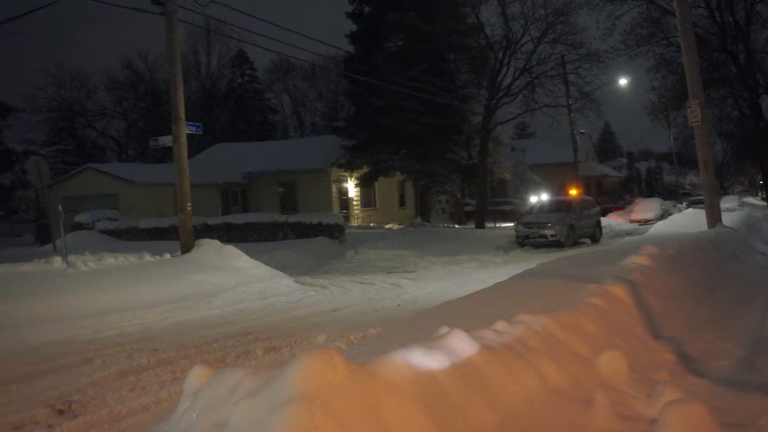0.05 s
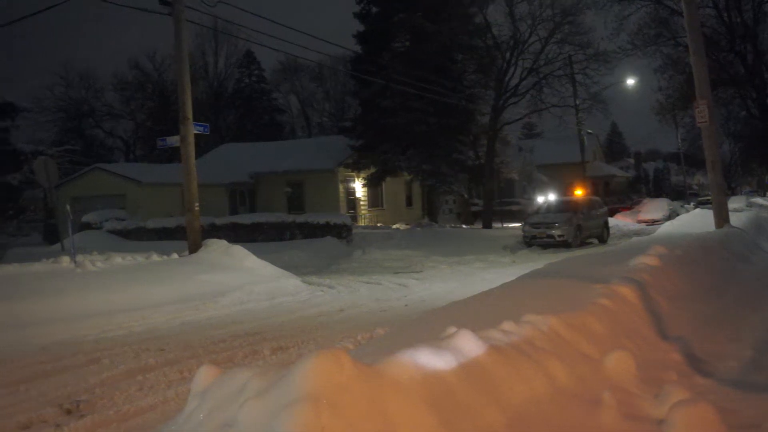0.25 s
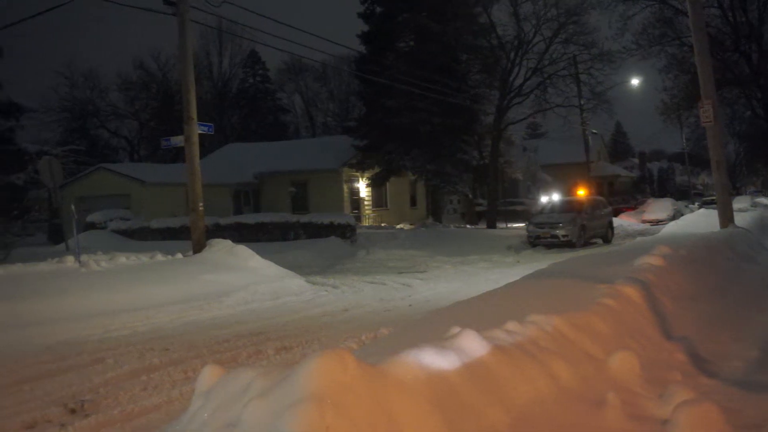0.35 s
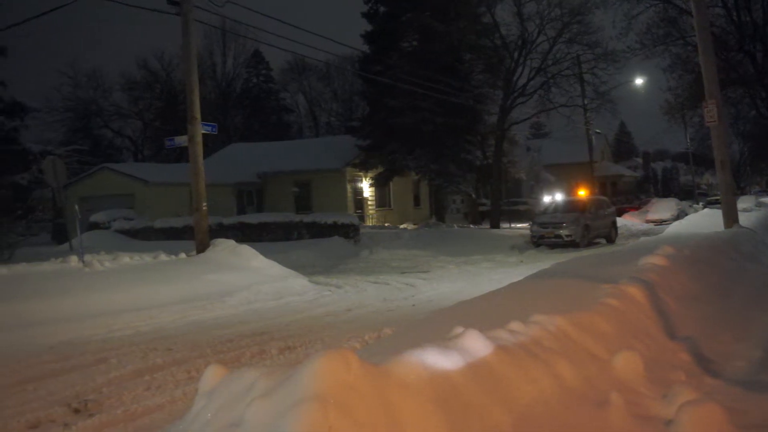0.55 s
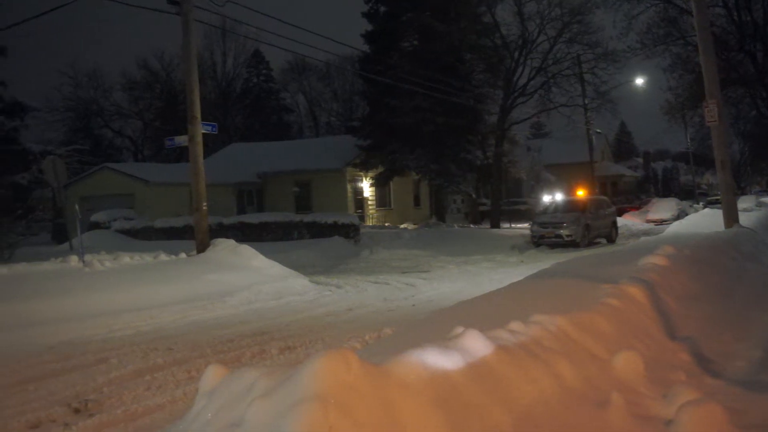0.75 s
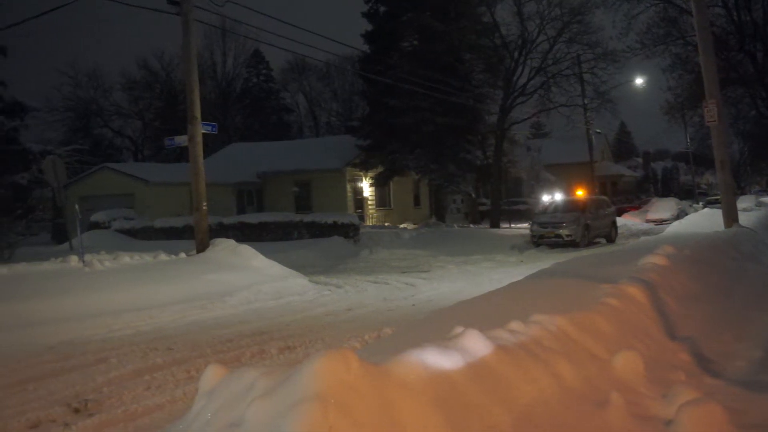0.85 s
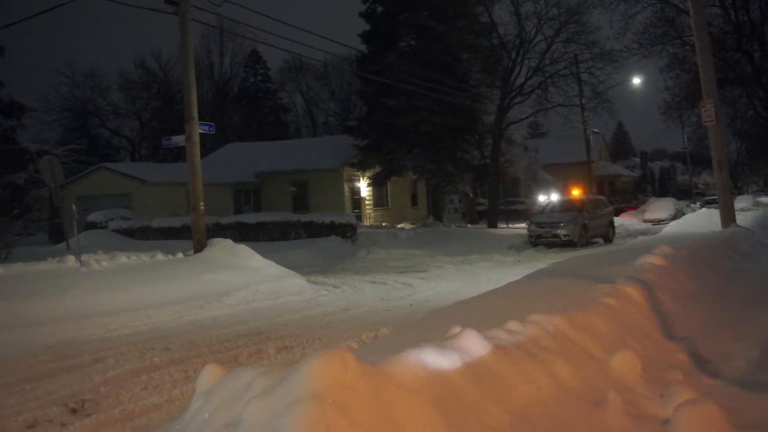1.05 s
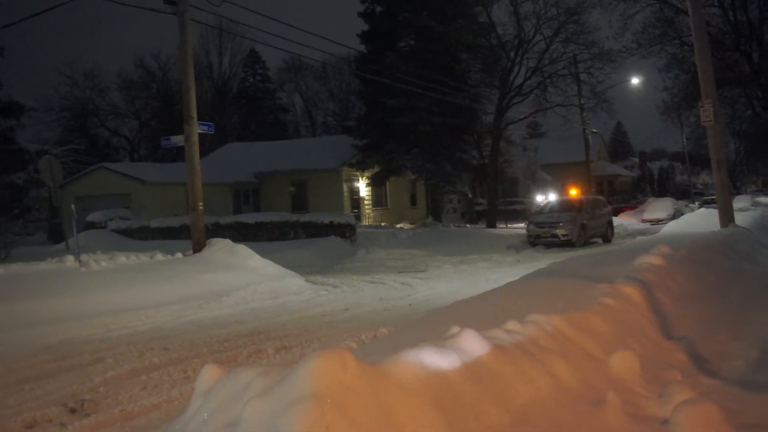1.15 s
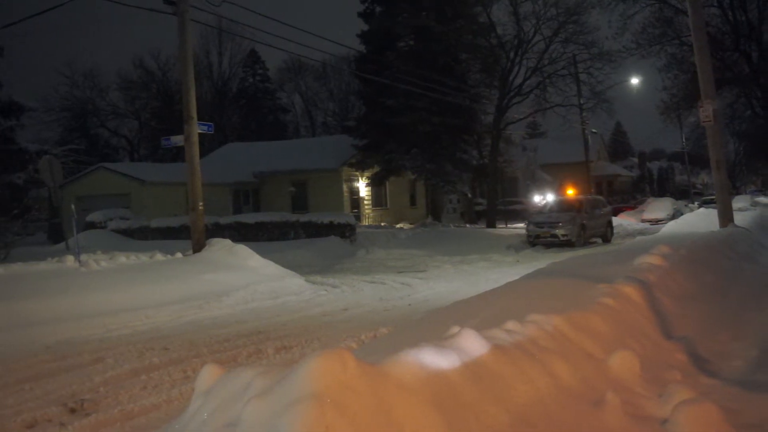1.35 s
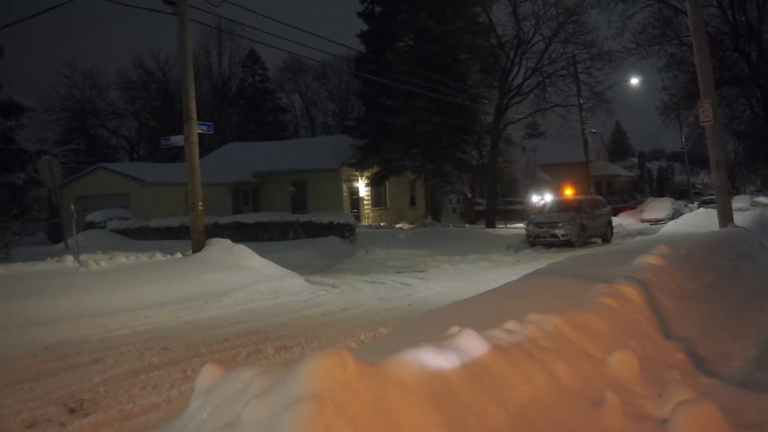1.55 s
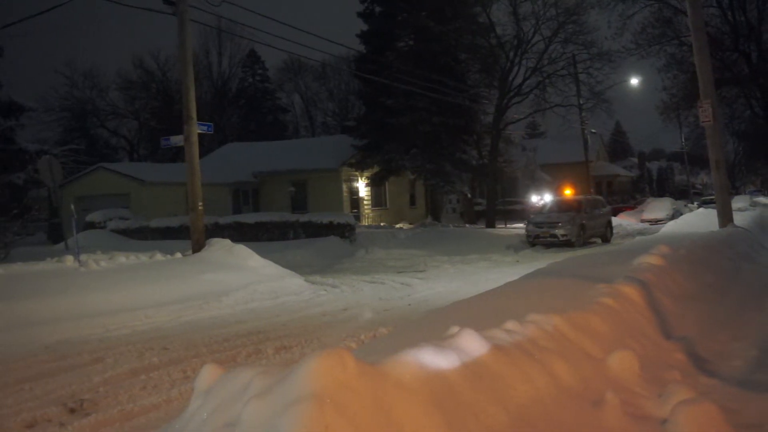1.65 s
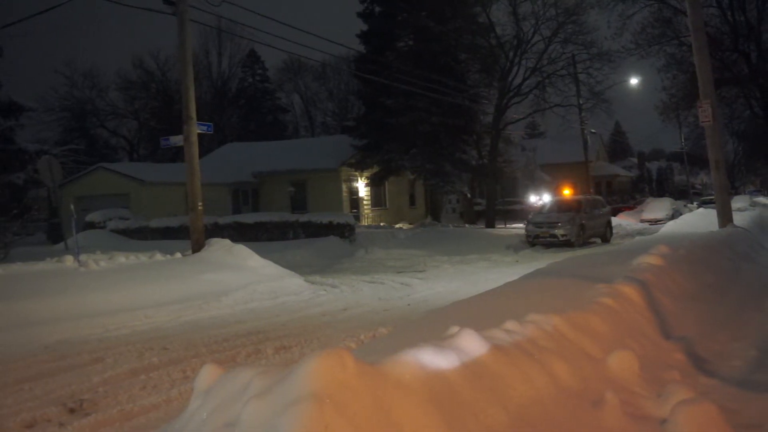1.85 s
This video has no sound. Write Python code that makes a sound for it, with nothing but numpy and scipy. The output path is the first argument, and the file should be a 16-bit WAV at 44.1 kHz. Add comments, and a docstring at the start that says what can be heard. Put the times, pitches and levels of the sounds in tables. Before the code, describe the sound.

Rapid metallic clacking from a pickup's spinning chained tyre, easing into faint jingling.

```python
"""A fast run of metal slaps rings out some way off: a pickup spins a chained tyre on a snowy night.
Each slap is a quick shower of links that crack on the ice, ring, and knock a hollow clonk from the wheel.
The slaps speed up as the engine climbs. Then the tyre grips and the slack chain clinks and jingles on.
Underneath are the engine's hum, a few soft thuds and the hush of the street."""
import sys
import numpy as np
from scipy import signal
from scipy.fft import rfft, irfft
from scipy.io import wavfile

SR = 44100
rng = np.random.default_rng(int(sys.argv[2]) if len(sys.argv) > 2 else 0)


def wav_record(signal):
    """Record a signal, one row per channel, as 16-bit PCM in the file named by sys.argv[1]."""
    frames = np.transpose(np.atleast_2d(signal))
    bounded = np.clip(frames, -1, 1)
    # unit amplitude maps onto the largest positive 16-bit level
    quanta = np.round(bounded * 32767).astype(np.int16)
    wavfile.write(sys.argv[1], SR, quanta)


N = 83790

# Chains hitting the road: time_s, level_db, extra_clonk_db, extra_crack_db, clonk_pitch_hz
SLAPS = [(0.221, -28.5, -10, -6, 850), (0.2478, -25, -4.5, 2, 870), (0.276, -20.5, -10, -2, 810),
         (0.3059, -20.5, 0.5, 5, 830), (0.3341, -17.5, -1.5, 1.5, 804), (0.3633, -18, -1, 5, 920),
         (0.3935, -14, 0.5, -2.5, 850), (0.423, -18.5, 2, 2.5, 934), (0.4532, -16.5, -1.5, 4, 800),
         (0.4834, -15.5, 2.5, 1, 843), (0.514, -14, -2, 1, 930), (0.5422, -15, 5, 1.5, 863),
         (0.5714, -13.5, 2.5, -1, 952), (0.6003, -17.5, 8, 2, 880), (0.6291, -15.5, 3, 3, 950),
         (0.657, -16.5, 0.5, 4.5, 836), (0.6848, -13.5, -1, 4, 919), (0.714, -14.5, -4, -1.5, 974),
         (0.7418, -13, -7, 3.5, 866), (0.7702, -15, 5.5, 1.5, 927), (0.7979, -18.5, 6, 8, 923),
         (0.8252, -15.5, 0, 0.5, 848), (0.8523, -14.5, 4.5, 0.5, 825), (0.879, -16, 1, 2.5, 807),
         (0.907, -14, -2.5, 3, 854), (0.9333, -17.5, 3.5, 6, 800), (0.9593, -10.5, -2, -0.5, 924),
         (0.9861, -17, 0.5, 4.5, 871), (1.012, -17, -8, 6.5, 990), (1.0389, -13.5, -2, -2.5, 920),
         (1.0629, -14, 1.5, 2.5, 970), (1.0869, -19, -19, 4, 920), (1.1114, -16, -9, 4, 835),
         (1.1359, -15, -1.5, -2.5, 850), (1.159, -19, -7, 0, 870), (1.1813, -23, 7, 2.5, 860),
         (1.2056, -25, 2, 0.5, 846), (1.2257, -22, -3, -1, 884), (1.2487, -24, -7, -2, 835),
         (1.2731, -27, -5, -3, 840), (1.292, -30, -12, -1, 834)]
# Slack chain clinking as the wheel rolls: time_s, level_db, rise_and_fall_s, crunch_db
CLINKS = [(1.3233, -35.5, 0.0015, -4), (1.3513, -37, 0.0022, 0), (1.392, -36, 0.0025, 1.5),
          (1.4131, -34.5, 0.0027, -4), (1.4906, -28, 0.0022, -8), (1.511, -36.5, 0.0031, -9),
          (1.585, -38.5, 0.0028, -2), (1.598, -31.5, 0.0072, -6), (1.678, -33.5, 0.0057, -7),
          (1.756, -34.5, 0.0091, -25)]
# Ringing notes of the chain on the road: pitch_hz, width_hz, level_db
CHAIN_NOTES = [(1460, 185, -1), (1725, 365, 1), (1935, 220, 0.5), (2288, 264, 0), (2620, 490, -1.5),
               (2792, 138, 7.5), (3477, 126, 1.5), (3783, 320, -0.5)]
# Upper edge of that ring, lower for the clinks: time_s, cutoff_hz
RING_TOP = [(1.28, 3880), (1.45, 2893)]
# Notes that linger in the steel links: pitch_hz, level_db
LINK_NOTES = [(1505, -36), (1779, 4), (1904, 2), (2325, -18), (2564, 11.5), (2680, 5), (2771, 6.5),
              (3380, 4), (3500, 4), (3797, 6.5), (4155, -14.5), (6910, -4), (7644, -34)]
# High zing of the tight chain: pitch_hz, width_hz, level_db
ZING_NOTES = [(3435, 155, -2.5), (3810, 230, -4.5), (4170, 110, 1.5)]
# Strength of the zing within a hit: time_s, level_db
ZING_LEVEL = [(.25, -32), (.33, -8.5), (.42, -12.5), (.454, -5.5), (.484, -15), (.514, -6), (.57, -18),
              (.66, -32), (.92, -20), (1.1, -13.5), (1.3, -18), (1.45, -25)]
# The wheel's own note beside its main clonk: pitch_hz, width_hz, level_db
WHEEL_NOTES = [(812, 45, -10)]
# Dull ring of the slack chain: pitch_hz, width_hz, level_db
SLACK_NOTES = [(2310, 143, 4), (1590, 900, -16), (790, 120, -4)]
# Tone of steel cracking on ice: frequency_hz, level_db
CRACK_TONE = [(100, -23.5), (400, 1), (600, 1.5), (1500, 8.5), (3900, 3), (4600, -1.5), (5400, -3.5),
              (6300, -2.5), (6900, 5.5), (7700, 6), (9000, 0), (10200, 0), (11000, 2.5)]
# Tone of slack chain crunching into snow: frequency_hz, level_db
CRUNCH_TONE = [(200, -22), (600, 4.5), (2300, 10), (3800, 2), (4700, 0), (5800, -6), (7500, -8.5),
               (11000, -8.5)]
# Tone of the loose links jingling: frequency_hz, level_db
JINGLE_TONE = [(200, -57.5), (550, -1), (870, 3.5), (1200, -9), (1700, 7), (2000, 1), (2330, 4.5),
               (2550, 0.5), (2800, 4), (3400, 0.5), (4100, -11), (4800, -17.5), (6200, -14), (7000, -24.5),
               (11000, -20.5)]
# How the jingle swells and fades: time_s, level_db
JINGLE_LEVEL = [(0, -43), (.2, -43.5), (.3, -38), (.55, -35), (1.1, -31.5), (1.25, -37.5), (1.38, -38.5),
                (1.55, -41), (1.72, -42), (1.9, -42)]
# The engine's speed and loudness: time_s, firing_rate_hz, level_db
ENGINE = [(0, 73.2, -62), (.16, 71.5, -73), (.21, 69.6, -64), (.33, 67.4, -71), (.52, 69.4, -65.5),
          (.8, 73, -62), (1, 76.2, -58.5), (1.12, 81.1, -56.5), (1.27, 93.2, -65), (1.36, 90, -66.5),
          (1.72, 90.3, -66), (1.9, 100.7, -69)]
# Tones that make up the engine's hum: multiple_of_firing_rate, level_db
ENGINE_TONES = [(1, 3), (2, -20), (3, -3), (4, -21)]
# Low thuds and groans of the truck: peak_s, half_length_s, pitch_hz, width_hz, level_db
THUDS = [(0.01, 0.082, 363, 90, -45.5), (0.124, 0.054, 289, 40.4, -42), (1.557, 0.034, 141.6, 39.5, -48),
         (1.709, 0.012, 93.4, 28, -47)]
# Tone of the street's hush: frequency_hz, level_db
STREET_TONE = [(20, -30), (45, -10), (80, -7), (150, -2), (270, 2), (370, 1), (560, 3), (850, 3.5),
               (1200, 0), (2500, -5), (4700, -21), (8000, -17), (11000, -26)]
# Loudness of that hush: time_s, level_db
STREET_LEVEL = [(0, -40.5), (.3, -42), (1.1, -41), (1.5, -43), (1.9, -46.5)]
# Tone of the echoes: frequency_hz, level_db
ECHO_TONE = [(200, -10), (600, -3), (900, -3), (1700, -5), (3000, -1), (5000, -1.5), (8000, -4.5),
             (11000, -2.5)]
# Balance of the chains between the ears: frequency_hz, left_minus_right_db
BALANCE = [(60, 0.5), (110, -5), (190, 1), (350, 3.5), (630, -0.5), (1120, -1.5), (2020, -2), (3630, -0.5),
           (6520, -2), (11700, -1.0)]

SLAP_RISE_S, SLAP_FALL_S = 0.0019, 0.003  # how fast a shower of links swells and dies
CHAIN_DB, LINK_DB, CLONK_DB, CRACK_DB, SLACK_DB = -7, -10, -12.5, -9, -3.5  # parts within a hit
LINK_FADE_S, NEAR_FADE_S, FAR_FADE_S = .055, 0.045, 0.94  # time to die away by 60 dB
NEAR_ECHO_DB, FAR_ECHO_DB, ECHO_DELAY_S = -13.5, -12, .005
SIDES = np.array([[1], [-1]])  # left ear, right ear


def chains():
    """The spinning wheel slaps its chains on the road; once it rolls, the slack chain clinks more dully."""
    out = np.zeros(N)
    tilts = 2 * rng.uniform(-0.75, 1, len(SLAPS))  # each crack's brightness, in dB per octave
    for (at, db, clonk_db, crack_db, clonk_hz), tilt in zip(SLAPS, tilts):
        crack_tone = [(hz, gain + tilt * np.log2(hz / 7000) + 2 * rng.standard_normal())
                      for hz, gain in CRACK_TONE]
        clonk = lambda knock, t: wheel_clonk(knock, t, clonk_hz)
        add_hit(out, at, db, SLAP_RISE_S, SLAP_FALL_S,
                clonk, CLONK_DB + clonk_db, crack_tone, CRACK_DB + crack_db)
    slack = lambda knock, t: ring(knock, SLACK_NOTES)
    for at, db, spread_s, crunch_db in CLINKS:
        add_hit(out, at, db, spread_s, spread_s, slack, SLACK_DB, CRUNCH_TONE, crunch_db)
    return out


def add_hit(out, at, db, rise_s, fall_s, body, body_db, crack_tone, crack_db):
    """Links land, crack on the road, knock a body (the wheel or the slack chain) and ring on."""
    size, lead = 6144, 1024  # samples in the hit, and before its peak
    t = (np.arange(size) - lead) / SR
    landing = link_shower(t, rise_s, fall_s)
    # The body takes its knock just early; the road cracks just after the links land.
    early, late = t + .0008, t - .0012
    knock = body(link_shower(early, 0.88 * rise_s, 0.88 * fall_s), early)
    crack_s = 0.82 * (rise_s + fall_s) / 2
    crack = colour(link_shower(late, crack_s, crack_s), crack_tone)
    link_width_hz = np.log(1000) / (np.pi * LINK_FADE_S)
    links = ring(landing, [(hz, link_width_hz, gain) for hz, gain in LINK_NOTES])
    top_hz = np.interp(at, *np.array(RING_TOP).T)
    chain = lowpass(ring(landing, CHAIN_NOTES, pitch_spread=.018), top_hz, order=10)
    zing = lowpass(ring(landing, ZING_NOTES), hz=4375, order=16)
    zing_db = np.interp(at, *np.array(ZING_LEVEL).T)
    parts = [(chain, CHAIN_DB), (links, LINK_DB), (zing, zing_db), (knock, body_db), (crack, crack_db)]
    hit = sum(undb(part_db) * unit(part) for part, part_db in parts)
    strength = undb(db) * np.sqrt(.0075 * SR / size)  # as if the hit's energy were packed into 7.5 ms
    start = int((at - .0017) * SR) - lead
    out[start:start + size] += (strength * hit)[:N - start]


def link_shower(t, rise_s, fall_s, clump_s=.0012):
    """Links land in uneven clumps that swell to a peak near t = 0 and die away."""
    marks = np.arange(t[0], t[0] + len(t) / SR + clump_s, clump_s)
    clumps = undb(1.8 * np.interp(t, marks, rng.standard_normal(len(marks))))
    swell = np.exp(-np.logaddexp(-t / rise_s, t / fall_s))
    return clumps * link_ticks(per_s=6000, scatter_db=2.5, size=len(t)) * swell


def link_ticks(per_s, scatter_db, size):
    """Links touch at random moments, each making one tick of uneven strength."""
    touches = rng.random(size) < per_s / SR
    return touches * rng.choice([-1, 1], size) * undb(scatter_db * rng.standard_normal(size))


def ring(x, notes, pitch_spread=0.0039, scatter_db=2.5):
    """Struck metal rings at its own notes, a little different each time; narrow notes last longer."""
    out = 0
    for (hz, width, db), (shift, gain) in zip(notes, rng.standard_normal((len(notes), 2))):
        b, a = signal.iirpeak(hz * (1 + pitch_spread * shift), hz / width, fs=SR)
        out = -out + undb(db + scatter_db * gain) * signal.lfilter(b, a, x)  # notes alternate in sign
    return out


def wheel_clonk(knock, t, hz, width_hz=80):
    """The links and one firm push of the tyre draw a hollow clonk from the wheel."""
    push = 1.2 * np.linalg.norm(knock) * signal.unit_impulse(len(t), np.argmin(abs(t)))
    wheel_band = signal.butter(2, (600, 1150), "bandpass", fs=SR, output="sos")
    blow = signal.sosfilt(wheel_band, knock + push)
    return ring(blow, [(hz, width_hz, 0)]) + ring(blow, WHEEL_NOTES)


def jingle(groups=8, ring_s=.003):
    """Loose links tick against each other, each group with its own short ring."""
    links = sum(tail(link_ticks(per_s=3000 / groups, scatter_db=3.5, size=N), np.log(1000) * ring_s)
                for _ in range(groups))
    return unit(colour(links, JINGLE_TONE)) * undb(curve(JINGLE_LEVEL))


def engine():
    """The exhaust hums a low, slightly uneven note that climbs as the wheel spins up."""
    phase = 2 * np.pi * np.cumsum(curve(ENGINE)) / SR
    note = sum(undb(db) * np.sin(k * phase + rng.uniform(0, 2 * np.pi)) for k, db in ENGINE_TONES)
    flutter = 1 + 0.19 * unit(lowpass(rng.standard_normal(N), hz=13, order=2))
    return np.sqrt(2) * note * flutter * undb(curve(ENGINE, column=2))


def thuds():
    """The truck gives short, low swells of sound, made rough by a wobbling pitch."""
    t, out = np.arange(N) / SR, 0
    for at, half_length_s, hz, width, db in THUDS:
        wobble = unit(lowpass(rng.standard_normal(N), width, order=2))
        tone = np.sin(2 * np.pi * np.cumsum(hz + width / 2 * wobble) / SR)
        out = out + undb(db) * np.exp(-((t - at) / half_length_s) ** 2) * tone
    return out


def street():
    """The running truck and the town blend into a soft hush."""
    return unit(colour(rng.standard_normal(N), STREET_TONE)) * undb(curve(STREET_LEVEL))


def echoes(x):
    """Sound bounces briefly off the truck and snowbanks, and lingers faintly among the houses."""
    bounced = colour(np.roll(x, int(ECHO_DELAY_S * SR)), ECHO_TONE)
    near = undb(NEAR_ECHO_DB) * tail(bounced, NEAR_FADE_S)
    return near + undb(FAR_ECHO_DB) * tail(bounced, FAR_FADE_S)


def stereo(x, side_db, delay_s=.002):
    """Place a sound a little to the right; nearby echoes differ between the ears."""
    hz, db = np.array(BALANCE).T
    balance_db = np.interp(np.log(np.fft.rfftfreq(N, 1 / SR) + 1), np.log(hz), db)
    placed = irfft(rfft(x) * undb(SIDES * balance_db / 2), N)
    side = tail(np.roll(x, int(delay_s * SR)), fade_s=.016)
    return placed + undb(side_db) * side * SIDES


def tail(x, fade_s):
    """Smear a sound into many tiny echoes that fall by 60 dB in fade_s."""
    t = np.arange(SR) / SR
    response = rng.standard_normal(SR) * np.exp(-np.log(1000) * t / fade_s)
    return signal.fftconvolve(x, response / np.linalg.norm(response))[:len(x)]


def colour(x, tone, size=2048):
    """Shape a sound's lows and highs to follow a tone table."""
    hz, db = np.array(tone).T
    gains = undb(np.interp(np.log(np.fft.rfftfreq(size, 1 / SR) + 1), np.log(hz), db))
    # Fold the filter so that it rings only after a tick, never before it.
    folded = irfft(np.log(gains))
    folded[1:size // 2] *= 2
    folded[size // 2 + 1:] = 0
    response = irfft(np.exp(rfft(folded)))
    return signal.fftconvolve(x, response / np.linalg.norm(response))[:len(x)]


def lowpass(x, hz, order):
    """Keep what lies below hz; a higher order cuts more steeply."""
    return signal.sosfilt(signal.butter(order, hz, fs=SR, output="sos"), x)


def curve(table, column=1):
    """Join one column of a table with straight lines over time."""
    rows = np.array(table)
    return np.interp(np.arange(N) / SR, rows[:, 0], rows[:, column])


def undb(db):
    """Turn decibels into a number to multiply by."""
    return 10 ** (np.asarray(db) / 20)


def unit(x):
    """Scale a sound to an average power of 1."""
    return x / np.sqrt(np.mean(x ** 2) + 1e-20)


def scene():
    """Chains, echoes and jingle sit a little to the right; engine, thuds and hush a little to the left."""
    hits = chains()
    bounces = echoes(hits)
    background = (street() + engine() + thuds()) * undb(1.5 * SIDES / 2)
    background += undb(-13) * street() * SIDES  # a second hush makes the street sound wide
    return stereo(hits, side_db=-16.5) + stereo(bounces + jingle(), side_db=-9) + background


def record(dry):
    """Cut away the very highest treble steeply."""
    return lowpass(dry, hz=10950, order=48)


dry = scene()
out = record(dry)
wav_record(out)
```